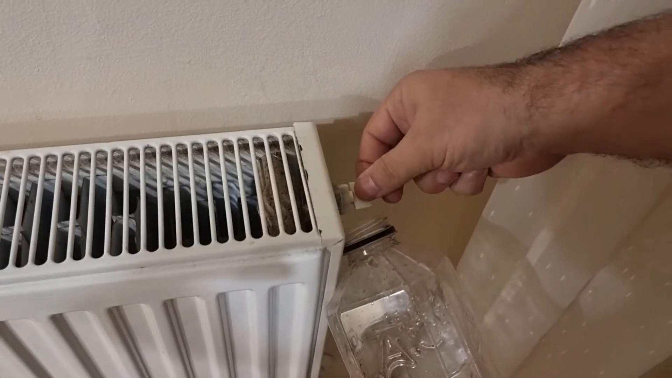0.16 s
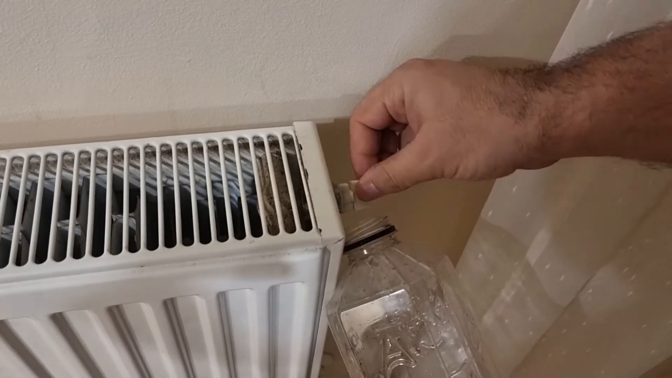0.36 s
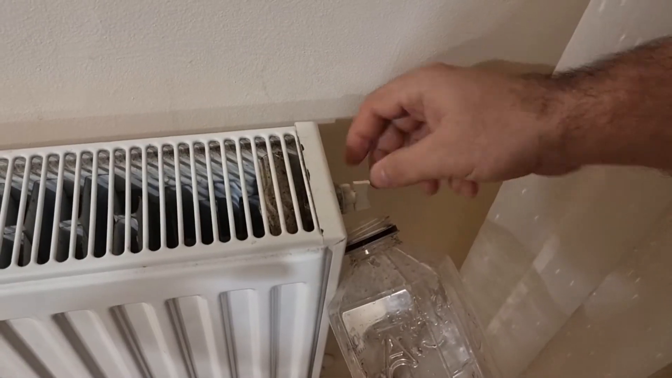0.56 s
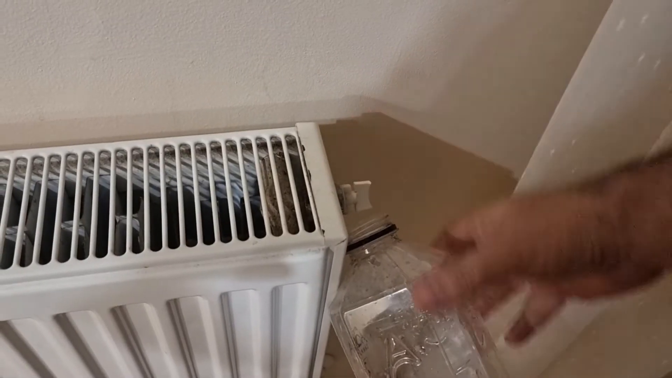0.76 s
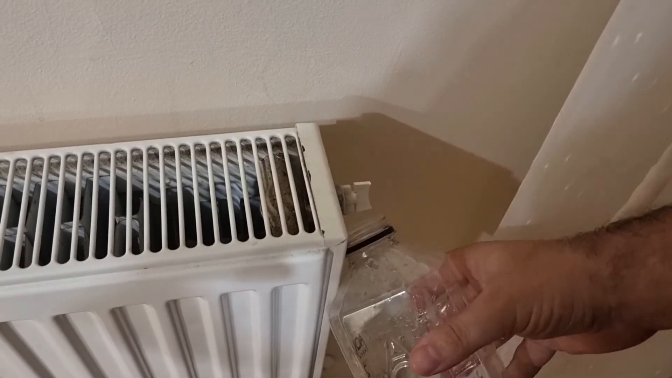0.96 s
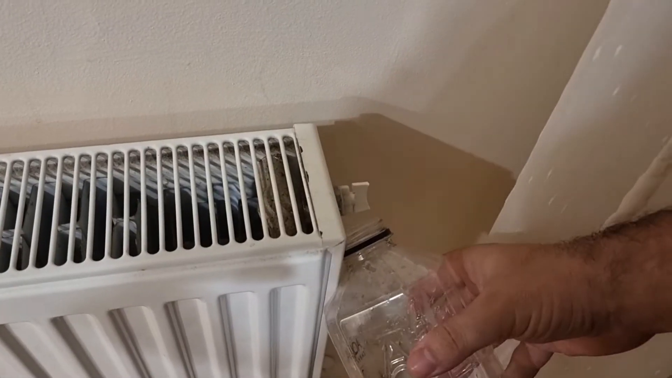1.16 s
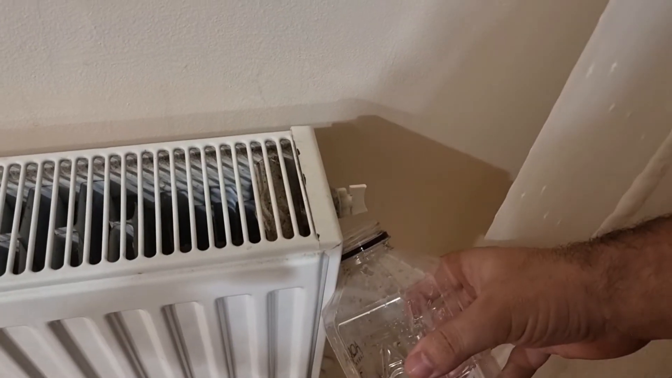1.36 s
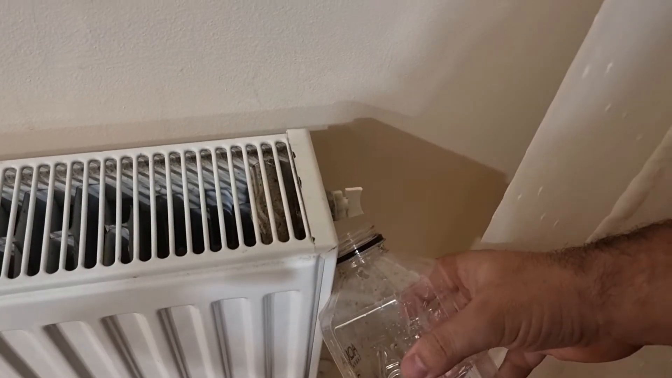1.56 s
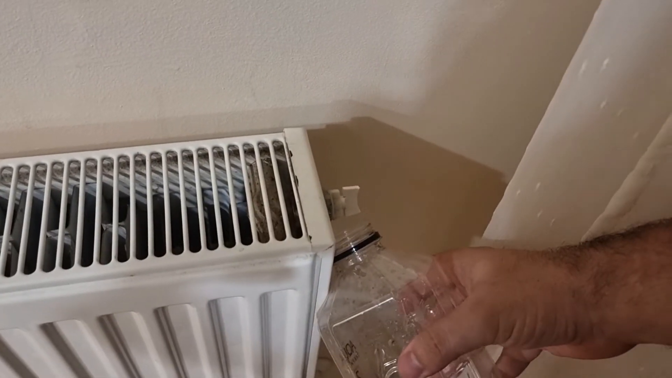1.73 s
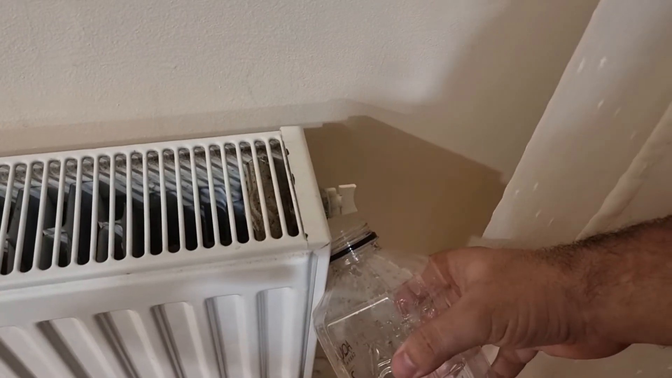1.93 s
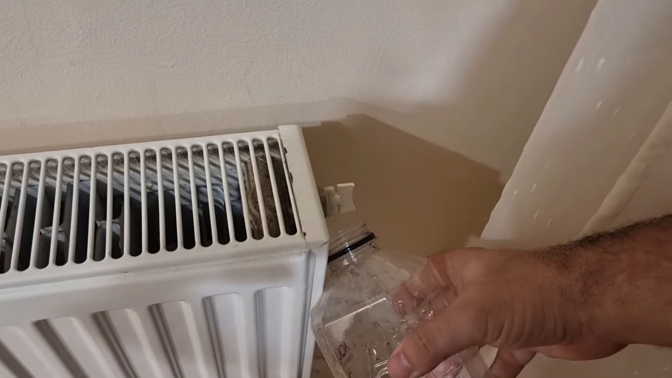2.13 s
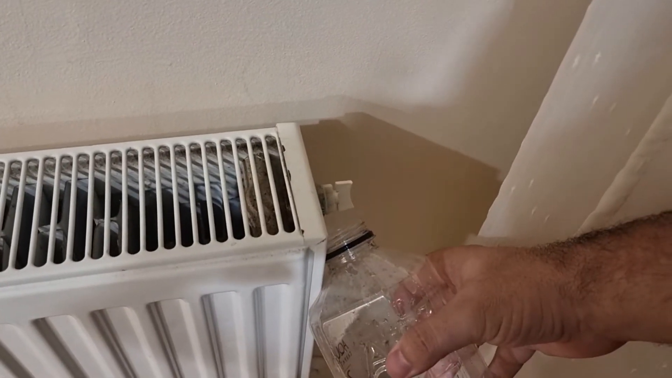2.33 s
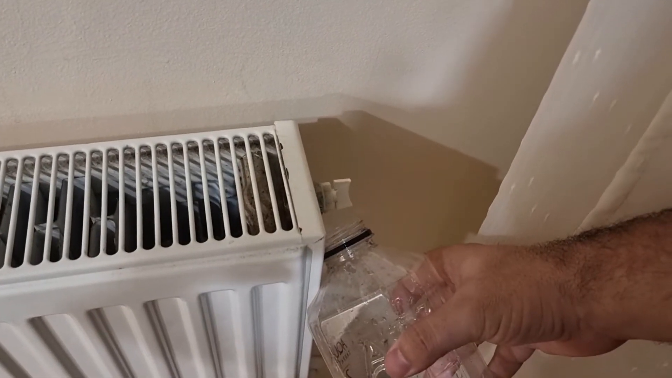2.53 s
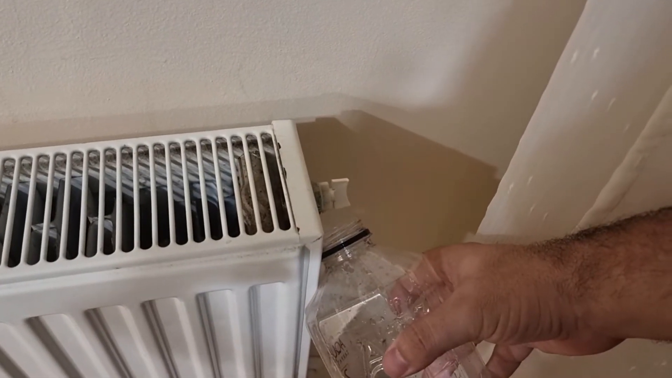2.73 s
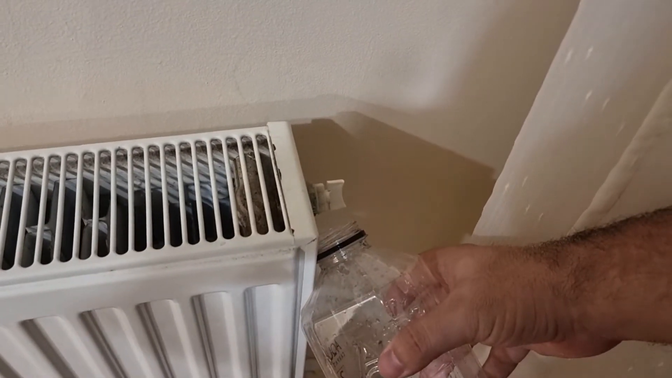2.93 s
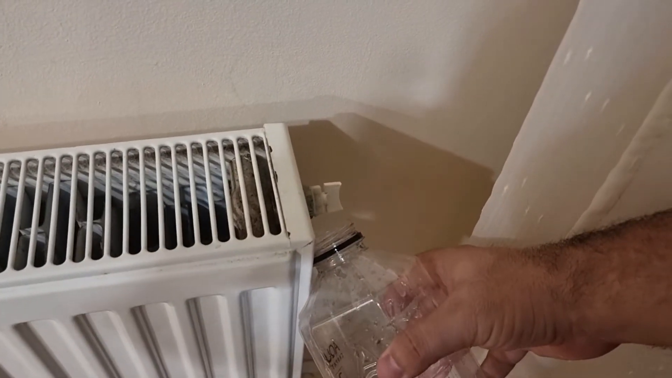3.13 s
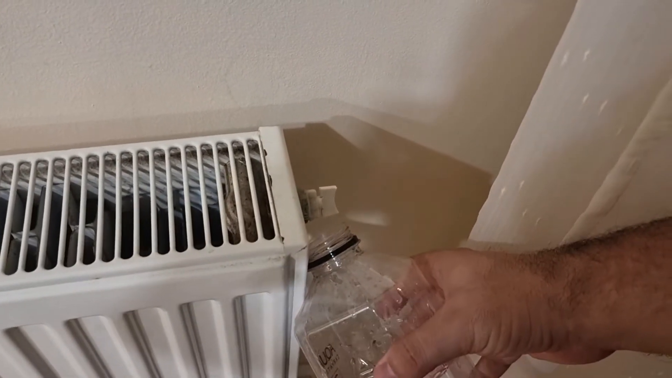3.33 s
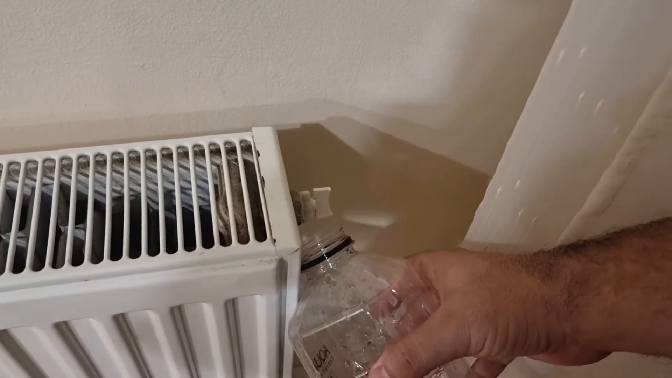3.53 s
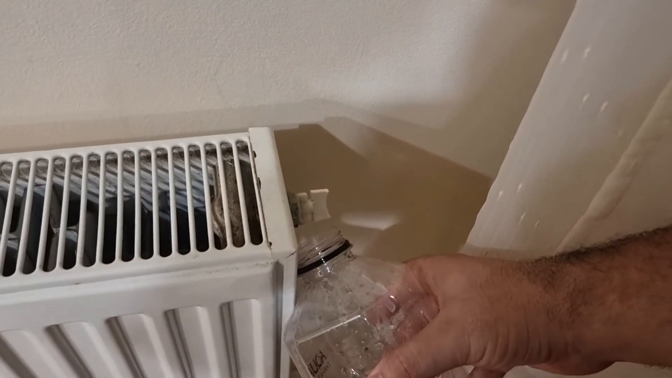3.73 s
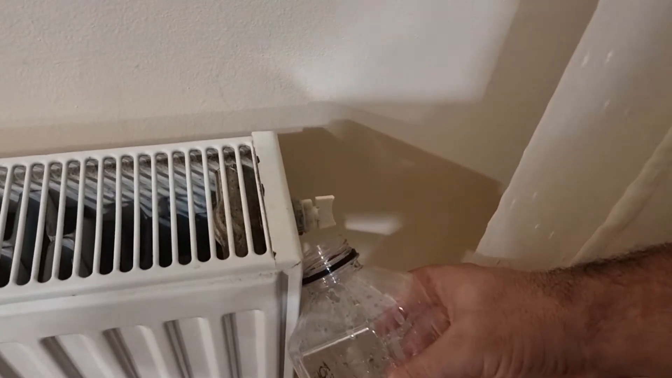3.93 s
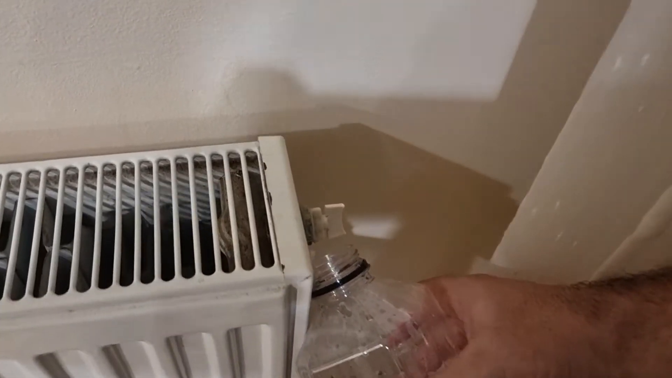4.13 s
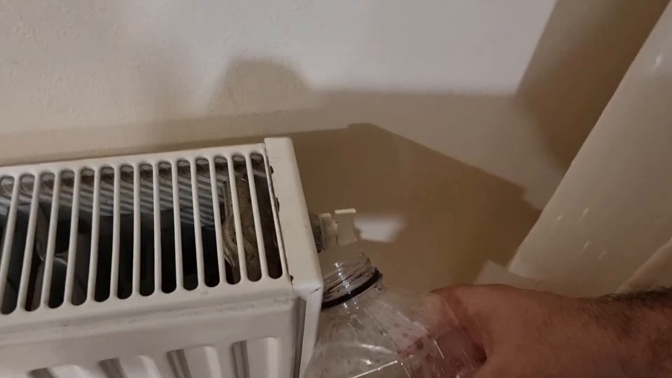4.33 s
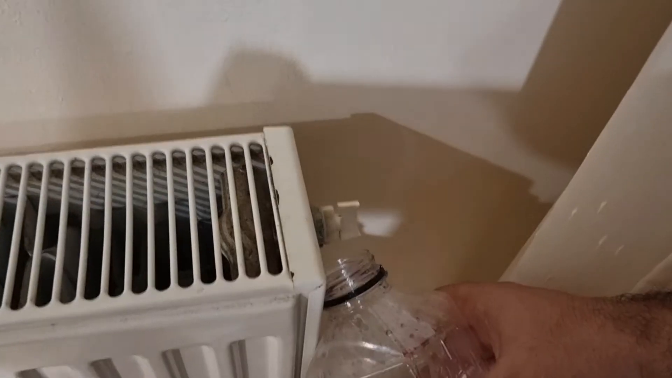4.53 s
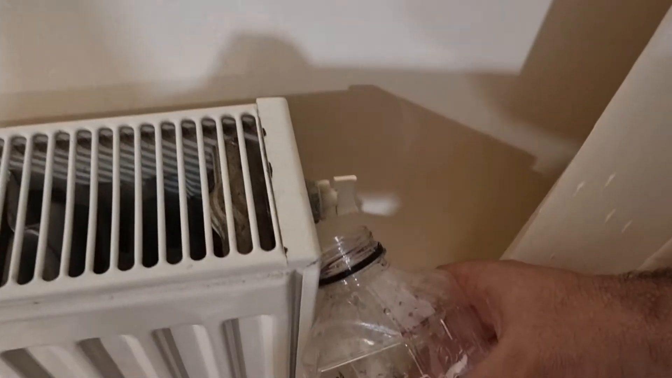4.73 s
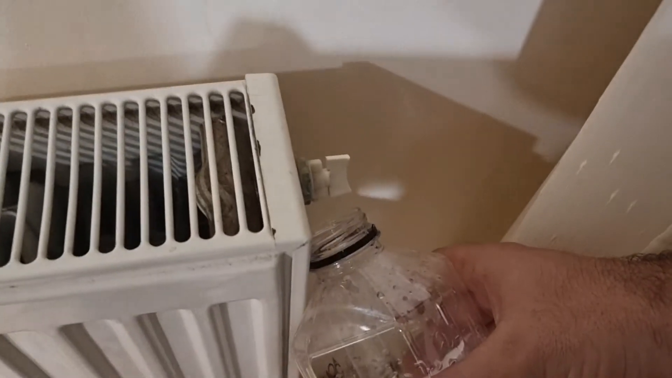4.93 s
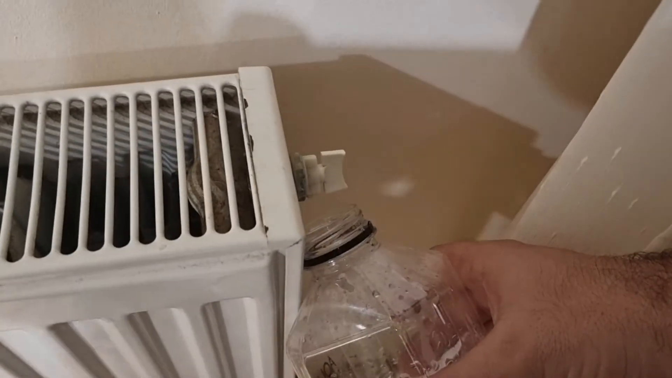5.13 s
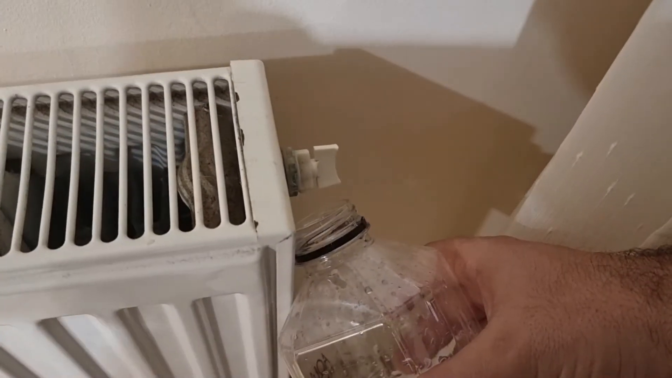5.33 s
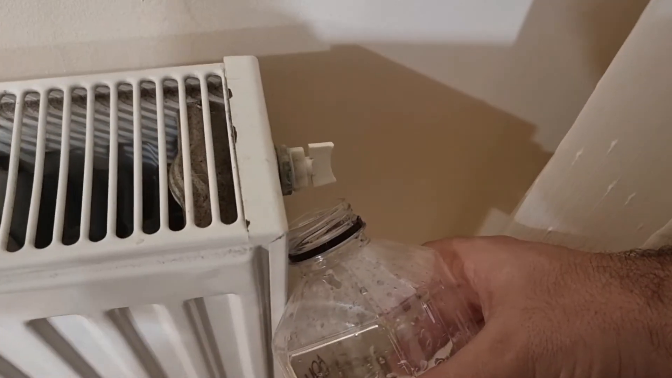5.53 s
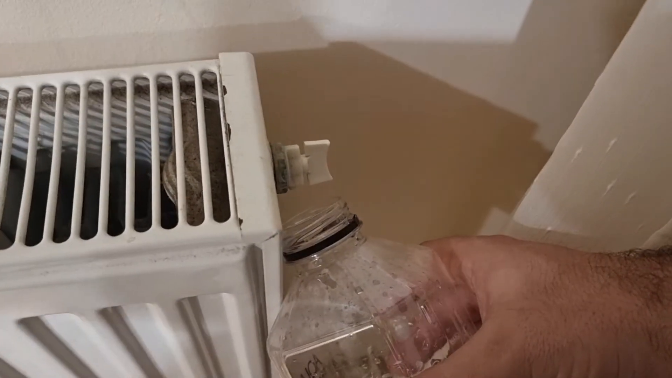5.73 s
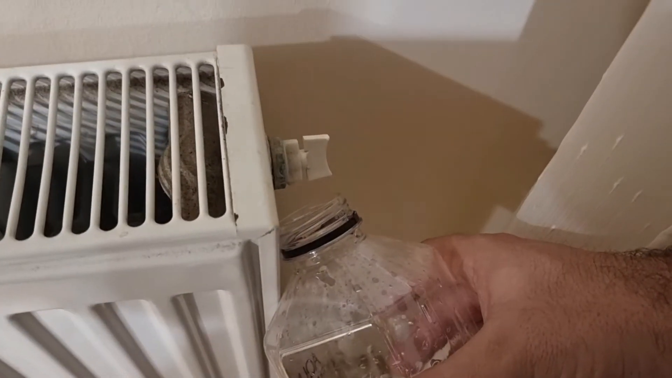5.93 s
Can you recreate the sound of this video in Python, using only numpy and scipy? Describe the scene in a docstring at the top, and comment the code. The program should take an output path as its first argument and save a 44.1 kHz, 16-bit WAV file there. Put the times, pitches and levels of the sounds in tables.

```python
"""Air hisses out of the opened bleed valve of a panel radiator: noise in six registers, coloured by reflections.
Breathy whistles come and go in it: noise rings narrow resonances. A low hum and a quiet room lie underneath.
A hand takes hold of the plastic bottle under the valve: it rubs, knocks and crackles through its ringing modes,
and now and then sings. The hand-held microphones shift, which changes treble and balance."""
import sys
import numpy as np
from scipy import signal
from scipy.fft import rfft, irfft
from scipy.io import wavfile

SR = 44100
rng = np.random.default_rng(int(sys.argv[2]) if len(sys.argv) > 2 else 0)


def transcribe(signal):
    """Save signal, clipped to [-1, 1], as a 16-bit WAV file at the path in sys.argv[1]."""
    frames = np.atleast_2d(signal).T
    limited = np.clip(frames, -1, 1)
    pcm = np.round(limited * 32767).astype(np.int16)
    wavfile.write(sys.argv[1], SR, pcm)


def how_loud(loudness_db):
    """Turn decibels into a plain amplitude multiplier (0 dB gives 1, 20 dB gives 10)."""
    steps = np.asarray(loudness_db, float) / 20
    return 10 ** steps


N = 263718   # length in samples
HZ = np.fft.rfftfreq(N, 1 / SR)
ROOM_T60_S = 0.3   # the room's answer to the bottle

# ringing modes of the bottle: (frequency [Hz], relative level [dB], t60 [s])
BOTTLE_MODES = [(205, -12.5, 0.12), (237, -14.5, 0.16), (284.5, -7, 0.11), (323, -3, 0.15),
                (543, -1.5, 0.039), (910, -5, 0.015), (387, -8.5, 0.092), (464, -10.5, 0.06),
                (1221, -4.5, 0.051), (1440, -8.5, 0.029), (1924, -2.5, 0.029), (2460, -25, 0.023)]
MODE_REFERENCE_HZ = BOTTLE_MODES[3][0]   # hardness tilts the modes about this one


def rms_one(x):
    """Scales to rms 1."""
    return x / np.sqrt(np.mean(x ** 2) + 1e-20)


def in_time(rows):
    """Columns of a table, one value per sample."""
    s, *columns = np.transpose(rows)
    return [np.interp(np.arange(N) / SR, s, column) for column in columns]


def at_hz(points):
    """A spectrum table read at every frequency, on a logarithmic pitch axis."""
    hz, values = np.array(points).T
    return np.interp(np.log(HZ + 1), np.log(hz), values)


def shaped(x, response):
    """Filters a signal by a frequency response."""
    return irfft(rfft(x) * response, N)


def drift(rate_hz):
    """Random wandering of spread 1, slower for a lower rate."""
    return rms_one(shaped(rng.standard_normal(N), 1 / (1 + (HZ / rate_hz) ** 2)))


def panned(pan_db):
    """Gains of left and right, pan_db apart."""
    return how_loud(np.array([pan_db / 2, -pan_db / 2]))


def ring(x, hz, t60):
    """A damped resonator: a unit click sets a decaying sine of starting height 1 ringing."""
    r = how_loud(-60 / (t60 * SR))
    w = 2 * np.pi * hz / SR
    return signal.lfilter([0, np.sin(w)], [1, -2 * r * np.cos(w), r * r], x + 1e-18)


def delayed(x, ms, size=6):
    """Reads an oversampled copy late by a fixed or changing time."""
    fine = signal.resample_poly(x, size, 1)
    return np.interp(size * (np.arange(N) - ms * SR / 1000), np.arange(size * N), fine)


def by_hold(values):
    """One value per microphone hold, gliding across while the microphones move."""
    # moves from one of the three holds to the next: (start [s], end [s])
    moves = [(1.5, 2.9), (3.9, 4.6)]
    first, second, third = values
    return np.interp(np.arange(N) / SR, np.ravel(moves), [first, second, second, third])


def echoes(x, t60, rise_s):
    """Dense reflections dying away, other ones at each microphone; power gain 1."""
    t = np.arange(int(t60 * SR)) / SR
    tail = rng.standard_normal((2, len(t))) * how_loud(-60 * t / t60) * np.minimum(t / rise_s, 1)
    tail /= np.sqrt(np.sum(tail ** 2, axis=1, keepdims=True))
    return signal.oaconvolve(x[None], tail, axes=1)[:, :N]


def scatter(x, count=13):
    """Reflections off hand, bottle and holder keep moving: one short echo pattern fades into the next."""
    place = np.linspace(0, count - 1, N)
    fades = [np.cos(np.pi / 2 * np.clip(place - k, -1, 1)) for k in range(count)]
    return sum(fade * echoes(x, t60=0.066, rise_s=0.00028) for fade in fades)


def jet(flutter_db=0.59, own_flutter_db=0.6):
    """Turbulent noise of escaping air; close reflections comb it, and each register has its own level path."""
    # the jet, as hand and bottle shade it: (time [s], level below 12 kHz [dB], level above 12 kHz [dB])
    jet_levels = [(0.0, -38.5, -34.5), (0.18, -39.5, -32.5), (0.46, -36, -32), (0.82, -37.5, -32),
                  (0.9, -38.5, -39.5), (0.98, -36.5, -31), (1.51, -38, -34), (1.66, -38.5, -37),
                  (1.9, -39.5, -34), (2.41, -39, -32.5), (2.65, -40, -38), (3.75, -40.5, -39),
                  (3.91, -40, -43.5), (4.03, -39, -41), (4.33, -40, -45), (4.75, -40, -49),
                  (5.9, -40.5, -48), (5.98, -39.5, -47)]
    # borders between the registers, low to high: [Hz]
    register_edges = [3500, 5500, 7500, 12000, 13600]
    # spectrum of the bare air noise: (frequency [Hz], relative density [dB])
    colour = [(900, -23.5), (1600, -16.5), (2050, -4), (2700, -4.5), (3600, -0.5), (4800, 0.5), (6500, 5),
              (7800, -9), (9200, -5), (10800, -4), (11900, -3.5), (13000, 1.5), (13900, -9.5),
              (15400, -11.5)]
    # reflections from wall, floor and radiator end: (delay after the direct sound [ms], gain)
    reflections = [(0.317, 0.081), (0.437, 0.22), (0.506, -0.091), (0.782, 0.013), (1.261, -0.12),
                   (2.073, -0.25), (2.159, 0.0031), (2.324, -0.15), (2.561, -0.11)]
    # each register, low to high: (level offset in each of three holds [dB], left minus right in each [dB])
    register_holds = [(-5, -4.5, -3.5, 1.5, -0.4, -0.1), (-4, -3, -4, -6, -3.5, -9),
                      (-6, -4, -6, -8.5, -11, -5), (-3.5, -4.5, -5, -4.5, -3, 0),
                      (-6, -2, -8, -8, -9.5, 6.5), (1.5, 0, 5.5, -2, 0, 6)]
    # the left microphone hears the jet later: delay in each of the three holds [ms]
    left_lag = [0.257, 0.2283, 0.211]
    # phase turn on the left: (frequency [Hz], turn [radians])
    left_turn = [(6800, 2.74), (8200, 5.35)]
    scatter_db, room_db = 0.5, -8   # against the air noise
    cutoff_hz = 15745               # the hiss stops here

    # the room's share is unrelated left and right
    air, *diffuse = shaped(rng.standard_normal((3, N)), how_loud(at_hz(colour)))
    comb = 1 + sum(gain * np.exp(-2j * np.pi * HZ * ms / 1000) for ms, gain in reflections)
    air = shaped(air, comb)
    left = delayed(shaped(air, np.exp(1j * at_hz(left_turn))), by_hold(left_lag))
    heard = np.array([left, air])
    heard = heard + how_loud(scatter_db) * scatter(air)
    heard = heard + how_loud(room_db) * np.array(diffuse)
    spectrum = rfft(heard * how_loud(flutter_db * drift(3.1)))

    # steep low-passes; neighbours subtracted give the six registers
    below = [0, *[1 / (1 + (HZ / edge) ** 40) for edge in register_edges], 1]
    body_db, treble_db = in_time(jet_levels)
    register_db = [body_db] * 4 + [treble_db] * 2
    out = 0
    for low, high, level_db, hold in zip(below, below[1:], register_db, register_holds):
        band = irfft(spectrum * (high - low) * (HZ < cutoff_hz), N)
        band /= np.sqrt(np.mean(band ** 2, axis=1, keepdims=True))
        gain = how_loud(level_db + by_hold(hold[:3]) + own_flutter_db * drift(31.0))
        out = out + band * gain * panned(by_hold(hold[3:]))
    return out


def breathy_tones(rows, cycles, fade_s):
    """Noise rings a doubled resonance into soft, unsteady tones that fade in and out."""
    t = np.arange(N) / SR
    out = 0
    for s, length, hz, db, pan_db in rows:
        fade = np.clip(np.minimum(t - s, s + length - t) / fade_s + 0.5, 0, 1) ** 2
        t60 = cycles / hz
        tone = ring(ring(rng.standard_normal(N), hz, t60), hz, t60)
        tone = tone / np.sqrt(np.average(tone ** 2, weights=fade))
        out = out + np.outer(panned(pan_db), how_loud(db) * fade * tone)
    return out


def whistles():
    """Breathy resonances that come and go in the jet."""
    # (start [s], length [s], frequency [Hz], level [dB], left minus right [dB])
    whistle_rows = [(0, 1.34, 2041, -56, 8), (0, 1, 14000, -50, 13), (.3, 1.5, 4587, -50, -6),
                    (.6, 1.33, 4990, -49.5, -11.5), (1.96, 1.5, 13000, -59, -2),
                    (4.25, .85, 4110, -53.5, -14), (4.55, 0.46, 4470, -51, -15),
                    (5.1, 1.05, 3680, -59.5, -13)]
    return breathy_tones(whistle_rows, cycles=146.0, fade_s=0.23)


def hum():
    """Two low sines, the weaker one of fixed pitch beating against a drone whose pitch wanders."""
    # the drone rises a little, then mostly sinks: (time [s], frequency [Hz], level [dB])
    drone_path = [(0.0, 51.96, -67.2), (0.4, 54.93, -62.2), (0.9, 54.08, -59.1), (1.9, 53.2, -54.8),
                  (2.25, 52.19, -56.1), (2.55, 52.14, -57.5), (3.5, 50.34, -54.1), (5.6, 50.71, -52.2),
                  (5.98, 50.97, -52.6)]
    # the tone of fixed pitch: (time [s], level [dB])
    fixed_tone_levels = [(0, -68), (1.7, -66), (2.3, -70), (3.2, -64), (4.4, -60), (5.98, -64)]
    hz, level_db = in_time(drone_path)
    drone = how_loud(level_db) * np.sin(2 * np.pi * np.cumsum(hz) / SR)
    fixed_tone = how_loud(*in_time(fixed_tone_levels)) * np.sin(2 * np.pi * 48.85 * np.arange(N) / SR)
    return np.outer(panned(-3.5), np.sqrt(2) * (drone + fixed_tone))   # root 2: the levels are rms


def room_tone(level_db=-59, patchy_db=1.0, pan_db=-2.0):
    """Low noise of uneven level; how alike the two sides are depends on frequency."""
    # spectrum: (frequency [Hz], relative density [dB])
    floor_colour = [(18, -27), (30, -28), (59, -31.5), (67, 1), (76, -4), (135, -15.5), (202, -15.5),
                    (232, -20.5), (319, -12), (638, -29), (808, -15.5), (1100, -24.5), (1700, -13.5),
                    (2210, -61), (3740, -120)]
    # left-right likeness, held within -1 (opposed) and 1 (the same): (frequency [Hz], likeness)
    likeness = [(60, 0.54), (200, 1), (400, -0.74), (800, 0.68), (1500, -1.75)]
    alike = np.clip(at_hz(likeness), -1, 1)
    mid, side = rfft(rng.standard_normal((2, N))) * how_loud(at_hz(floor_colour))
    pair = irfft(np.sqrt(1 + alike) * mid + np.sqrt(1 - alike) * side * [[1], [-1]], N)
    return rms_one(pair) * how_loud(level_db + patchy_db * drift(1.2)) * panned(pan_db)[:, None]


def rub(hard_db=10.0, pan_db=-1.5, wet_db=-2.0):
    """The bottle slides along the radiator end: rough friction noise runs through all its modes."""
    # (time [s], level [dB])
    rub_levels = [(.3, -79), (.36, -51), (.45, -50.5), (.58, -58.5), (1.3, -72), (1.6, -86)]
    friction = rng.standard_normal(N) * how_loud(2.0 * drift(25.0))
    modes = 0
    for hz, db, t60 in BOTTLE_MODES:
        tilt_db = hard_db * np.log2(hz / MODE_REFERENCE_HZ)   # hard_db per octave
        modes = modes + how_loud(db + tilt_db) * ring(friction, hz, t60)
    sound = rms_one(modes) * how_loud(*in_time(rub_levels))
    return np.outer(panned(pan_db), sound) + how_loud(wet_db) * echoes(sound, ROOM_T60_S, 0.0026)


def knocks(crackle_db=-13, crackle_ms=85.0, crackles_per_s=110.0, room_db=-5):
    """Each contact strikes every mode with its own strength, then the thin plastic crackles as it settles."""
    # (time [s], mode drive [dB], hardness [dB per octave], thump drive [dB], left minus right [dB])
    contacts = [(0.345, -61, 7.5, -47, -13), (0.76, -52, 8, -60, -7), (0.97, -34.5, -9, -62, -2),
                (.986, -39, 2, -31.5, -5), (1.076, -50, -6, -70, -2), (1.109, -23, -2, -52, -5),
                (1.491, -50.5, -5, -60, -1), (2.639, -58, 0, -48, -17), (3.09, -58, -13, -46, -14),
                (4.376, -59, 0, -38, -9), (4.71, -51.5, 3.5, -37, -3), (5.922, -56, 2, -38, -17)]
    out, mono = np.zeros((2, N)), np.zeros(N)
    t = np.arange(SR // 2) / SR
    # so small a body sends out no deep bass
    bass_cut = signal.butter(2, 53, "high", fs=SR, output="sos")
    # the flesh of the hand lands softly
    push = t * np.exp(-t / 0.003)
    push = push / push.sum()
    for s, level_db, hard_db, thump_db, pan_db in contacts:
        when, size = rng.random((2, len(t)))
        crackle = (when < crackles_per_s / SR) * (2 * size - 1) * np.exp(-1000 * t / crackle_ms)
        force = how_loud(crackle_db) * crackle
        force[0] = 1   # the strike itself
        # the push of the hand, carried by the panel
        sound = how_loud(thump_db) * ring(push, hz=89, t60=0.24)
        strengths_db = 2.0 * rng.standard_normal(len(BOTTLE_MODES))
        for k, ((hz, db, t60), own_db) in enumerate(zip(BOTTLE_MODES, strengths_db)):
            tilt_db = hard_db * np.log2(hz / MODE_REFERENCE_HZ)
            # modes next to each other in the table start opposed
            sound += (-1) ** k * how_loud(level_db + db + own_db + tilt_db) * ring(force, hz, t60)
        sound = signal.sosfilt(bass_cut, sound)
        at = round(s * SR)
        sound = sound[:N - at]
        mono[at:at + len(sound)] += sound
        out[:, at:at + len(sound)] += np.outer(panned(pan_db), sound)
    return out + how_loud(room_db) * echoes(mono, ROOM_T60_S, 0.009)


def bottle_singing():
    """The jet at the bottle's neck, or a slipping finger, stirs a resonance into a brief tone."""
    # (start [s], length [s], frequency [Hz], level [dB], left minus right [dB])
    singing_rows = [(.42, 0.154, 332, -59.5, -8), (1.062, 0.025, 1450, -45, -2), (3.5, 0.2, 910, -64, 6),
                    (3.91, 0.16, 910, -65, 3), (4.44, .16, 815, -64.5, -5), (5.275, .18, 570, -58, 1),
                    (5.67, 0.074, 548, -68, -1), (5.83, 0.059, 564, -67, -1)]
    return breathy_tones(singing_rows, cycles=95.0, fade_s=0.03)


def scene():
    """All sources at the two microphones."""
    bottle = rub() + knocks() + bottle_singing()
    bottle[0] = delayed(bottle[0], ms=0.28)   # the bottle too is heard later on the left
    return jet() + whistles() + hum() + room_tone() + bottle


def band_limit(x):
    """A steep low-pass at the top of the band."""
    return signal.sosfilt(signal.butter(12, 16940, fs=SR, output="sos"), x)


def record(dry):
    """Turns the finished mix into the sound as heard."""
    return band_limit(dry)


dry = scene()
out = record(dry)
transcribe(out)
```